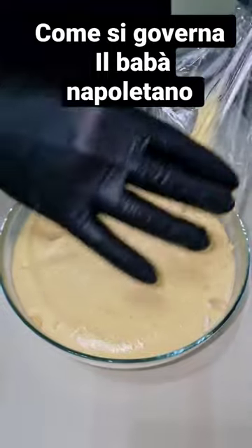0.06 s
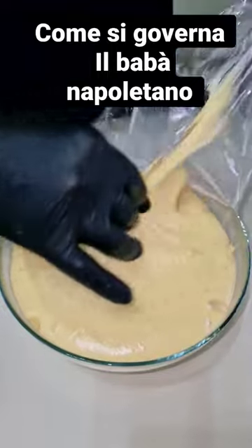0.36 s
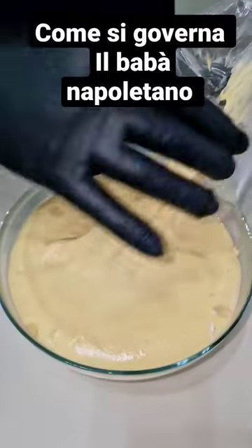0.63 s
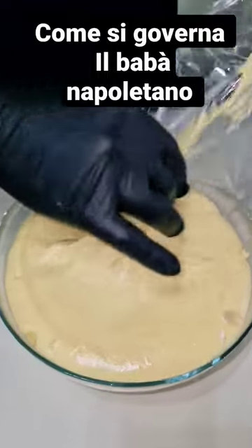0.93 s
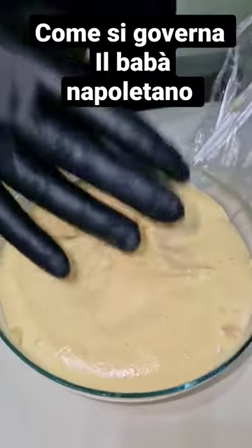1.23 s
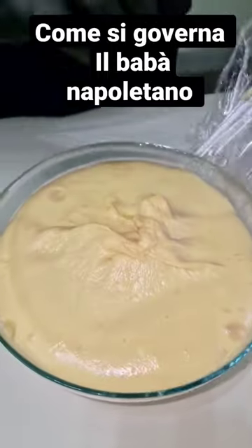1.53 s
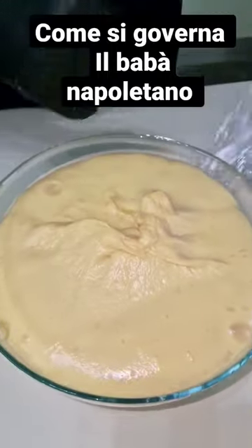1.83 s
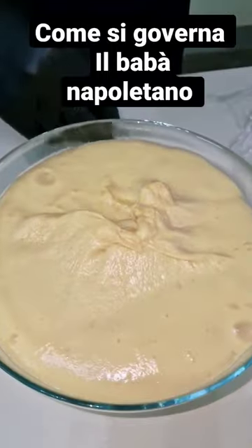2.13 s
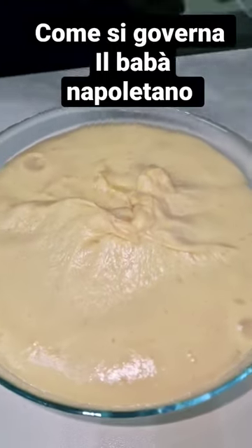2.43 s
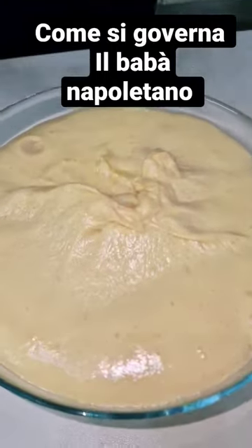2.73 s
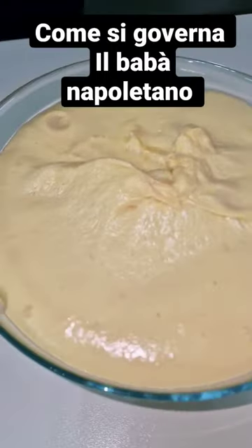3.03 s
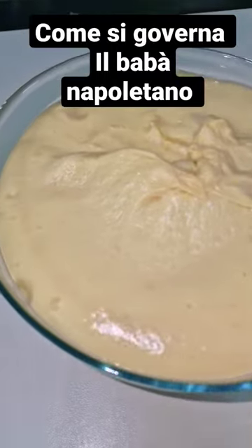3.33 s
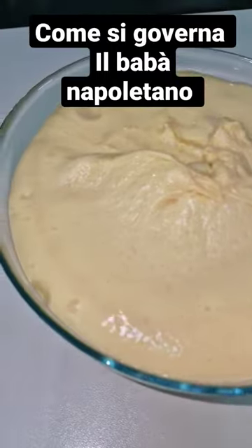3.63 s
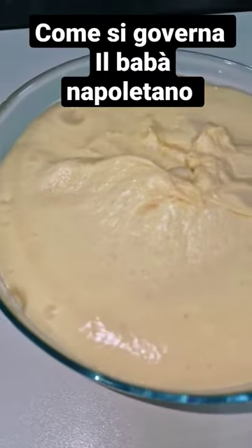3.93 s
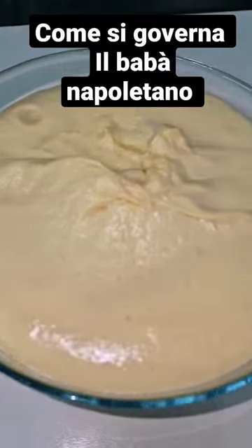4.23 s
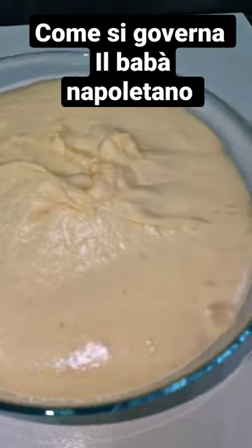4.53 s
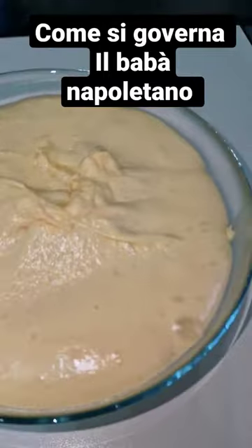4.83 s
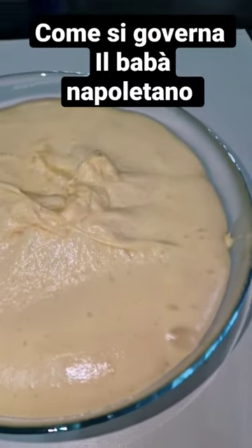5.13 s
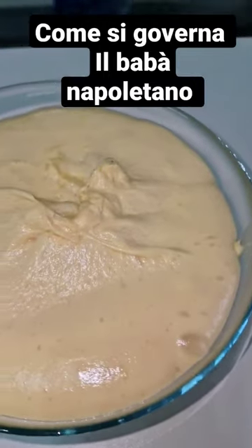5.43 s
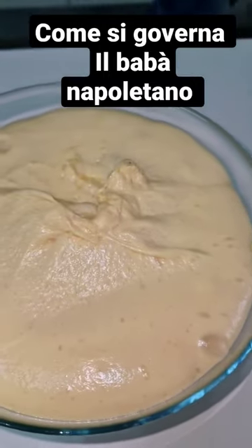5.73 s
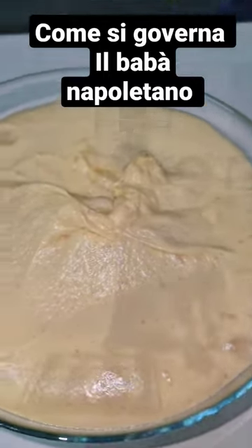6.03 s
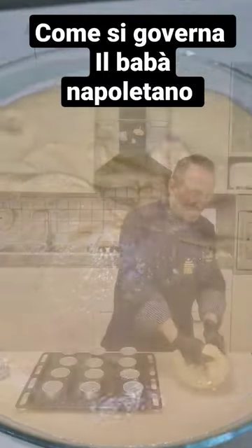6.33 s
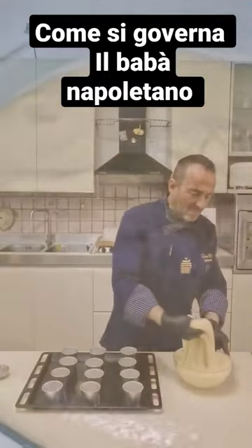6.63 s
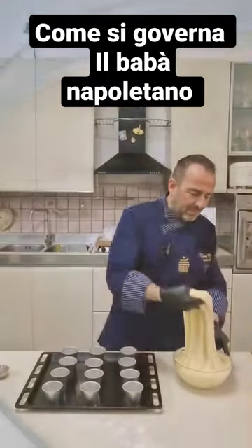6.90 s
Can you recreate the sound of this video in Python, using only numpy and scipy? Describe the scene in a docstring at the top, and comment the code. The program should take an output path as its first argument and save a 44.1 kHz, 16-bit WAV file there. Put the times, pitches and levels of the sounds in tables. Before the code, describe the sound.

From the start, cling film crackles lightly, close to the microphone, as it is peeled off a bowl of dough in short tugs. The loudest moment comes at about 1.2 seconds, a sharp cluster of snapping creases. After a brief lull there is another crackle around 2 seconds. From roughly 2.8 to 5 seconds the film is gathered and balled up in a busy run of crinkles, crunches and small snaps, turning thinner and brighter near the end. Between 5 and 5.5 seconds a few soft, low bumps hit the microphone while the crinkling fades. From about 5.8 seconds, sticky dough is pulled and lifted a little farther off, giving quiet, dull plops and squelches, again near 6.4 and 6.9 seconds, with a faint glove rustle. Very low kitchen room tone lies underneath.

```python
"""Cling film off sticky dough

Close up, a gloved hand peels cling film off dough in a glass bowl, gathers it and balls it up: creases
buckle and snap, folds crunch and the sheet flaps. A few soft bumps thud on the microphone. Farther off
in the kitchen the dough is lifted, its air pockets giving dull plops and squelches."""
import sys
import numpy as np
from scipy import signal
from scipy.fft import rfft, irfft
from scipy.io import wavfile
from scipy.ndimage import uniform_filter1d

SR = 44100
rng = np.random.default_rng(int(sys.argv[2]) if len(sys.argv) > 2 else 0)


def file_out(sig):
    """Save sig as 16-bit WAV at sys.argv[1]."""
    # one column per channel
    cols = np.atleast_2d(sig).T
    # limit, then scale
    lim = np.clip(cols, -1, 1)
    pcm = np.round(lim * 32767).astype(np.int16)
    wavfile.write(sys.argv[1], SR, pcm)


N = 315746
TIME = np.arange(N) / SR

# Tone of the room air and hiss: freq_hz, gain_db
AIR_EQ = [(30, -11.5), (100, -7), (300, -10.5), (600, -4.5), (1200, -5.5), (2500, -3.5), (4200, -0.5),
          (5500, -4.5), (7100, -1), (8800, -5.5), (11000, -5.5), (13000, -10)]
# Fader ride on the room air: time_s, level_db
AIR_FADER = [(0, -67), (1.05, -71), (2.5, -69.5), (5.8, -67), (6.5, -73.5), (7.15, -78)]
# Tugs and squeezes of the film; crunch and flap ride on the crackle level:
# peak_s, hold_s, release_s, crackle_db, crunch_offset_db, flap_offset_db
FILM_STROKES = [ (0.0, 0.006, 0.028, -43.5, -9, -20), (0.416, 0.013, 0.045, -45.5, -20, -13),
                (0.458, 0.011, 0.052, -35.5, -21.5, -23), (0.51, 0.016, 0.11, -52, -13.5, -20),
                (0.665, 0.068, .06, -48.5, 2, -22), (0.729, 0.032, 0.026, -36.5, -0.5, -14.5),
                (0.786, 0.056, 0.11, -48, 1, -6.5), (0.893, 0.041, 0.03, -38.5, -3, -12.5),
                (1.21, 0.013, 0.055, -27, -24, -60), (1.224, 0.0072, 0.052, -21.5, -7.5, -17.5),
                (1.277, 0.052, 0.064, -22.5, -5, -8), (1.496, 0.038, .07, -63.5, -17, -20),
                (1.85, 0.053, 0.11, -53, -19.5, -27.5), (2.039, 0.036, 0.051, -26.5, -9.5, -15.5),
                (2.098, 0.054, 0.11, -36, -11, -31.5), (2.194, 0.037, 0.084, -40.5, -9.5, -31),
                (2.817, .07, 0.14, -31, -11, -29), (2.922, 0.059, 0.068, -31, -13.5, -19.5),
                (3.068, 0.097, 0.091, -39.5, -11.5, -13), (3.216, 0.044, 0.16, -32.5, -4.5, -10.5),
                (3.276, 0.051, 0.035, -28.5, -7.5, -15), (3.397, 0.024, 0.03, -47, -2.5, -13.5),
                (3.635, 0.045, 0.098, -26.5, -4.5, -20), (3.696, 0.085, 0.023, -29.5, -6, -27),
                (3.894, 0.038, 0.039, -42, -8.5, -13.5), (3.993, 0.09, 0.15, -29.5, -7.5, -18),
                (4.32, 0.027, .05, -26.5, -8, -33.5), (4.395, 0.044, 0.074, -34.5, -12, -35),
                (4.649, .035, 0.056, -36.5, -9.5, -30), (4.756, 0.056, 0.047, -32, -12, -28.5),
                (4.856, 0.017, 0.18, -32, -12.5, -33.5), (4.96, 0.046, 0.02, -31.5, -11, -33),
                (5.04, 0.033, 0.067, -54.5, -7, -12.5), (5.167, 0.048, 0.064, -41.5, -19.5, -23.5),
                (5.317, 0.046, 0.096, -57, -12, -11.5), (5.43, 0.026, 0.24, -44.5, -22.5, -24),
                (5.669, 0.012, 0.077, -36.5, -25.5, -39), (5.75, 0.036, 0.13, -58, -8, -30), ]
# Tone of the film in each of its five states: freq_hz, gain_db
STUCK_EQ = [(100, -14), (450, 7), (1000, 2), (2000, 8), (3500, 2), (5200, -8), (7200, 6), (10000, -3.5),
            (13000, 2.5)]
TAUT_EQ = [(50, -35.5), (120, -26), (220, -21), (320, -12.5), (600, -4.5), (1800, 6.5), (2800, -1),
           (5000, -2), (7500, 2.5), (9600, -7), (13000, -2)]
LOOSE_EQ = [(50, -47), (130, -39.5), (280, -21.5), (1100, -9), (1800, 3.5), (2800, -2.5), (4200, 2.5),
            (5400, -3), (7000, 1), (9500, -6.5), (13000, -9)]
BALLED_EQ = [(100, -36), (280, -27.5), (550, -29), (900, -16), (1100, -19.5), (1800, -5), (2250, -9.5),
             (2900, 0.5), (4200, 7), (7500, 1.5), (13000, -3)]
TUCKED_EQ = [(100, -15), (450, -17), (1500, -21.5), (2500, -19.5), (3300, -20), (4700, -7), (6300, -7.5),
             (8000, -18), (10700, -12), (13000, -10)]
# Hollows squeezed between glove, film and dough: start_s, length_s, level_db, pitch_hz
HOLLOW_SQUEEZES = [(0.0, 0.1, -65.5, 1600), (0.0, 0.1, -66, 447), (0.234, 0.24, -69.5, 377),
                   (0.45, 0.042, -42.5, 3440), (0.381, 0.35, -69.5, 408), (1.42, .13, -67, 1370),
                   (1.823, 0.21, -65, 2420), (2.16, 0.094, -54.5, 1410), (2.171, 0.16, -56, 2220),
                   (2.727, 0.21, -47, 2260), (3.854, 0.062, -59, 870), (4.003, 0.2, -46, 970),
                   (4.142, 0.2, -65, 410), (4.525, 0.29, -70, 297), (4.674, 0.082, -57.5, 880),
                   (5.136, 0.12, -41.5, 4030), (5.134, 0.089, -64.5, 693), (5.283, 0.13, -64.5, 960)]
# Single creases snapping through: start_s, level_db, body_offset_db
CREASE_SNAPS = [(0.36, -33.5, -19), (0.4172, -32, -27), (0.4196, -29.5, -28), (0.4627, -26, -28),
                (0.4768, -32, -37), (0.521, -30.5, -30), (0.6105, -32.5, -12.5), (0.667, -29.5, -21),
                (0.7027, -39, -12), (0.728, -20.5, -7), (0.759, -21.5, -32), (0.833, -25, -13),
                (0.873, -26, -24), (0.897, -21.5, -18), (0.909, -25, -3), (0.9362, -24, -6),
                (1.183, -16, -32.5), (1.2155, -3.5, -22), (1.2385, -10, -7), (1.276, -12, -14),
                (1.2868, -5.5, -4), (1.772, -43.5, -20.5), (2.005, -26.5, -34), (2.0508, -16, -24),
                (2.769, -32, -20), (2.911, -20, -28), (3.2995, -20.5, -16.5), (3.3215, -11, -28),
                (3.606, -27.5, -14.5), (3.7697, -11.5, -35.5), (3.981, -16.5, -17), (4.304, -12, -27.5),
                (4.8572, -20, -45), (4.9995, -17.5, -34), (5.013, -30, -4.5), (5.163, -26.5, -36),
                (5.66, -33.5, -30)]
# Air pockets closing and opening in the dough: start_s, level_db, pitch_hz
DOUGH_PLOPS = [(3.901, -41, 304), (3.919, -36, 302), (3.962, -37.5, 293), (5.754, -44, 231),
               (5.772, -34.5, 261), (5.803, -43.5, 310), (5.903, -38.5, 672), (5.907, -48, 958),
               (6.367, -51.5, 697), (6.377, -36, 195), (6.39, -37.5, 237.5), (6.427, -52.5, 623),
               (6.56, -48.5, 204), (6.789, -53, 215), (6.886, -29.5, 312.6), (6.887, -37, 440),
               (6.925, -42, 342), (6.926, -40, 568), (6.954, -37, 396)]
# Soft bumps on the microphone: start_s, level_db, pitch_hz
MIC_BUMPS = [(5.083, -33, 87.5), (5.123, -45.5, 85.6), (5.169, -51, 79.3), (5.199, -46.5, 86.5),
             (5.274, -52.5, 113), (5.34, -45.5, 60), (5.434, -46.5, 80), (5.456, -41, 71.4),
             (6.209, -65, 79.8)]
# Fader ride on the glove's rustle: time_s, level_db
GLOVE_FADER = [(5.74, -58), (5.78, -52.5), (5.9, -78), (6.05, -82), (6.25, -70.5), (6.45, -72.5),
               (6.6, -79), (6.72, -73.5), (6.8, -90)]
# Tone of the glove: freq_hz, gain_db
GLOVE_EQ = [(1800, -46.5), (3200, -27), (5600, -23.5), (7100, -2), (8300, -16.5), (9200, -7.5),
            (10000, -38), (13000, -18)]
# Pulls on the dough: peak_s, hold_s, gurgle_db, tear_db
DOUGH_PULLS = [(5.778, 0.022, -45.5, -57.5), (5.885, 0.024, -70, -50), (6.393, 0.013, -49, -70),
               (6.551, 0.0065, -69, -61.5), (6.667, 0.042, -72.5, -87), (6.807, 0.013, -64, -87),
               (6.903, 0.034, -43.5, -55)]
# Tone of the stretching dough: freq_hz, gain_db
DOUGH_EQ = [(100, -15.5), (175, -5), (270, 3.5), (380, -9.5), (480, -10.5), (650, -4.5), (830, -12),
            (970, -9.5), (1130, -22.5), (1300, -14.5), (1450, -23.5), (2400, -28.5)]
# Peaks and dips of the microphone's port: centre_hz, width_hz, gain_db
MIC_PORT_EQ = [(2650, 1100, -1), (7100, 1200, 1.5), (7980, 170, -7), (8710, 370, 4.5), (11350, 210, 5),
               (11400, 710, -13), (12650, 480, -3.5)]

# Cues: the film comes unstuck, then is peeled taut, gathered, balled up, tucked away and left still.
PEEL_S, GATHER_S, BALL_S, TUCK_S, STILL_S = .6, 2.6, 4.6, 5.03, 5.85


def from_db(db):
    """Decibels to gain."""
    return 10 ** (np.asarray(db) / 20)


def fader(points):
    """A level ride as a gain per sample, silent outside its span."""
    times_s, levels_db = np.transpose(points)
    return from_db(np.interp(TIME, times_s, levels_db, left=-150, right=-150))


def butter(x, hz, kind, order=2):
    """Causal Butterworth filter."""
    return signal.sosfilt(signal.butter(order, hz, kind, fs=SR, output="sos"), x + 1e-18)


def equalise(x, curve, size=2048):
    """Minimum-phase EQ, so no attack rings early."""
    hz, db = np.transpose(curve)
    bins_hz = np.arange(size // 2 + 1) * SR / size
    shape_db = np.interp(np.log(bins_hz + 1), np.log(hz), db)
    cepstrum = irfft(np.log(from_db(shape_db)))
    cepstrum[1:size // 2] *= 2
    cepstrum[size // 2 + 1:] = 0
    return signal.oaconvolve(x, irfft(np.exp(rfft(cepstrum))))[:N]


def leveller(x, window_s):
    """Holds the rms near 1 over a window and keeps the finer grain."""
    size = int(window_s * SR)
    power = uniform_filter1d(uniform_filter1d(x * x, size), size)
    return x / np.sqrt(np.abs(power) + 1e-4 * np.mean(x * x) + 1e-20)


def grains(per_s, spread_db):
    """Clicks at random moments, most small and a few large."""
    sizes = from_db(spread_db * np.minimum(rng.exponential(1, N), 3.5))
    signs = rng.choice([-1, 1], N)
    return sizes * signs * (rng.random(N) < per_s / SR)


def ring(clicks, hz, t60_s):
    """Each click sets a decaying sine ringing."""
    decay, step = from_db(-60 / (t60_s * SR)), 2 * np.pi * hz / SR
    return signal.lfilter([0, np.sin(step)], [1, -2 * decay * np.cos(step), decay ** 2], clicks + 1e-18)


def pings(clicks, low_hz, high_hz, cycles, count=20):
    """Each click rings at one of many pitches, falling 60 dB over the given cycles."""
    voice = rng.integers(0, count, N)
    pitches = np.geomspace(low_hz, min(high_hz, .45 * SR), count)
    return sum(ring(clicks * (voice == k), hz, cycles / hz) * hz / high_hz
               for k, hz in enumerate(pitches))


def swell(peak_s, attack_s, hold_s, release_s):
    """Envelope of one gesture: up 20 dB over the attack, a hold, down 20 dB over the release."""
    early, late = np.maximum(peak_s - TIME, 0), np.maximum(TIME - peak_s - hold_s, 0)
    return from_db(-20 * np.minimum(early / attack_s + late / release_s, 10))


def pulse(hz, t60_s, rise_s):
    """A damped swing of air with a soft start."""
    t = TIME[:SR // 4]
    return np.sin(2 * np.pi * hz * t) * from_db(-60 * t / t60_s) * (1 - np.exp(-t / rise_s))


def room_air():
    """A faint bed of room tone and hiss."""
    return fader(AIR_FADER) * leveller(equalise(rng.standard_normal(N), AIR_EQ), .3)


def fold_reflections(x, depth=.2, drift_per_s=17, count=10):
    """Tiny echoes between folds, glove and bowl come and go, shifting the film's resonances."""
    delays_s = np.geomspace(.0002, .0022, count) * rng.uniform(.85, 1.15, count)
    echoes = np.zeros(N)
    for lag in (delays_s * SR).astype(int):
        drift = np.interp(TIME * drift_per_s, np.arange(1000), rng.standard_normal(1000))
        echoes += drift * np.pad(x, (lag, 0))[:N]
    return x + depth * echoes


def crinkle(per_s, spread_db, rub_db, avalanche_s=.0018):
    """Creases buckle: each sets off a tiny avalanche and rings a facet, over film rubbing on film."""
    clicks = grains(per_s, spread_db)
    avalanche_power = signal.lfilter([1], [1, -np.exp(-1 / (avalanche_s * SR))], clicks ** 2 + 1e-18)
    cracks = np.sqrt(avalanche_power) * rng.standard_normal(N)
    facets = pings(clicks, 400, 21000, cycles=5.6)
    rub = from_db(rub_db) * rng.standard_normal(N)
    return fold_reflections(cracks / cracks.std() + facets / facets.std() + rub)


def film(creases, eq, from_s, to_s, attack_s):
    """One stage of handling: with each stroke creases crackle, folds crunch and the sheet flaps."""
    power = np.zeros((3, N))
    for peak_s, hold_s, release_s, db, crunch_db, flap_db in FILM_STROKES:
        if from_s <= peak_s + attack_s < to_s:
            band_gains = from_db([db, db + crunch_db, db + flap_db])
            power += np.outer(band_gains, swell(peak_s, attack_s, hold_s, release_s)) ** 2
    crackle_gain, crunch_gain, flap_gain = np.sqrt(power)
    sheet = equalise(creases, eq)
    crackle = crackle_gain * leveller(butter(sheet, 3194, "high", order=4), .016)
    crunch = crunch_gain * leveller(butter(sheet, [1000, 3000], "band", order=4), .05)
    flap = flap_gain * leveller(butter(sheet, 790, "low", order=4), .0082)
    return from_db(.75) * crackle + from_db(-3.5) * crunch + from_db(-1.43) * flap


def hollows(edge_ratio=1.075):
    """Rubbing excites a narrow air resonance that swells and fades with each squeeze."""
    out = np.zeros(N)
    for start_s, length_s, db, hz in HOLLOW_SQUEEZES:
        resonance = butter(rng.standard_normal(SR), [hz / edge_ratio, hz * edge_ratio], "band")
        squeeze = np.hanning(int(length_s * SR))
        add(out, start_s, from_db(db) * squeeze * leveller(resonance, .014)[-len(squeeze):])
    return out


def tacky_ticks():
    """Faint tacky ticks come now and then from the sticky film while it is handled."""
    return from_db(-46) * butter(grains(per_s=22, spread_db=2.5), 2500, "high") * (TIME < STILL_S)


def snaps():
    """A taut crease lets go: a sharp crack, a brief tail and a push from the sheet for body."""
    out, t = np.zeros(N), TIME[:SR // 30]
    fade = np.exp(-t / .0005) + .16 * np.exp(-t / .005)
    for start_s, db, body_db in CREASE_SNAPS:
        burst = rng.standard_normal(len(t)) * fade
        crack, body = butter(burst, [2000, 12000], "band"), butter(burst, [850, 2200], "band")
        snap = crack / np.abs(crack).max() + from_db(body_db - .5) * body / np.abs(body).max()
        add(out, start_s, from_db(db) * snap)
    return out


def plops():
    """Large air pockets in the dough pop, each radiating little below its own pitch."""
    out = np.zeros(N)
    for start_s, db, hz in DOUGH_PLOPS:
        pocket = butter(pulse(hz, t60_s=.067, rise_s=.0012), .21 * hz, "high", order=3)
        add(out, start_s, from_db(db + 3) * pocket)
    return out


def mic_bumps():
    """Fingers shifting on the microphone's housing thud for a cycle or two."""
    out = np.zeros(N)
    for start_s, db, hz in MIC_BUMPS:
        add(out, start_s, from_db(db + 5) * pulse(hz, t60_s=.069, rise_s=.0011))
    return out


def glove_rustle(creases):
    """The glove creases with a faint, thin rustle."""
    return fader(GLOVE_FADER) * leveller(equalise(creases, GLOVE_EQ), .042)


def squelches(attack_s=.027, release_s=.11):
    """Small air pockets gurgle and tear open as each pull grips the dough and slowly relaxes."""
    power = np.zeros((2, N))
    for peak_s, hold_s, gurgle_db, tear_db in DOUGH_PULLS:
        power += np.outer(from_db([gurgle_db, tear_db]), swell(peak_s, attack_s, hold_s, release_s)) ** 2
    gurgle_gain, tear_gain = np.sqrt(power)
    pockets = equalise(pings(grains(per_s=2500, spread_db=1.93), 135, 1874, cycles=38), DOUGH_EQ)
    gurgle = gurgle_gain * leveller(butter(pockets, 354, "low", order=4), .0081)
    tear = tear_gain * leveller(butter(pockets, 447, "high", order=4), .008)
    return gurgle + tear


def add(out, start_s, sound):
    """Drops a short sound onto a track."""
    at = round(start_s * SR)
    out[at:at + len(sound)] += sound[:N - at]


def kitchen(x, t60_s, wet_db, predelay_s=.002):
    """Direct sound plus a diffuse tail from worktop, tiles and cupboards."""
    t = TIME[:SR // 2]
    tail = rng.standard_normal(len(t)) * from_db(-60 * t / t60_s) * (t > predelay_s)
    return x + from_db(wet_db) * signal.oaconvolve(x, tail / np.linalg.norm(tail))[:N]


def scene():
    """Film close and nearly dry, dough dull and farther off, room air under both."""
    taut = crinkle(per_s=800, spread_db=4.6, rub_db=-4)
    loose = crinkle(per_s=2300, spread_db=6.5, rub_db=3.5)
    peel = film(taut, STUCK_EQ, 0, PEEL_S, attack_s=.02)
    peel += film(taut, TAUT_EQ, PEEL_S, GATHER_S, attack_s=.044)
    crumple = film(loose, LOOSE_EQ, GATHER_S, BALL_S, attack_s=.047)
    crumple += film(loose, BALLED_EQ, BALL_S, TUCK_S, attack_s=.054)
    crumple += film(loose, TUCKED_EQ, TUCK_S, STILL_S, attack_s=.04)
    air = room_air()
    near = kitchen(peel + crumple + snaps() + hollows() + tacky_ticks(), t60_s=.071, wet_db=-14.5)
    dough = butter(plops() + squelches(), [130, 1800], "band", order=3)
    far = kitchen(dough, t60_s=.36, wet_db=-7)
    return (near + far + glove_rustle(loose) + mic_bumps() + air)[None]


def record(dry):
    """The microphone's port colours the treble; the deepest bass and the top are cut."""
    for hz, width_hz, db in MIC_PORT_EQ:
        band = signal.lfilter(*signal.iirpeak(hz, hz / width_hz, fs=SR), dry)
        dry = dry + (from_db(db) - 1) * band
    high_cut = signal.ellip(12, .1, 80, 13050, fs=SR, output="sos")
    return signal.sosfilt(high_cut, butter(dry, 35, "high"))


dry = scene()
out = record(dry)
file_out(out)
```